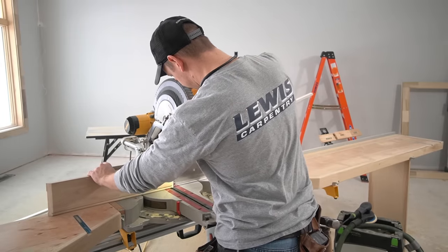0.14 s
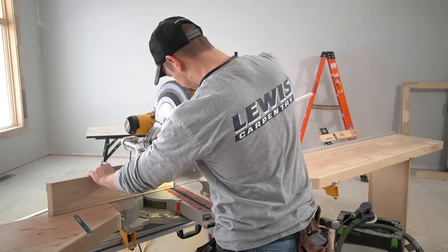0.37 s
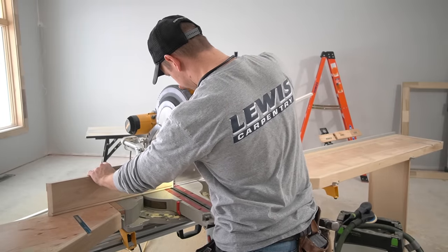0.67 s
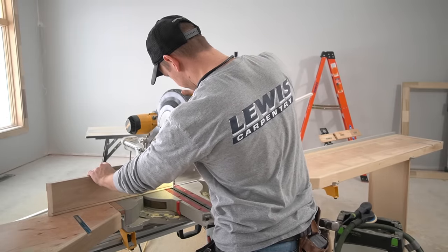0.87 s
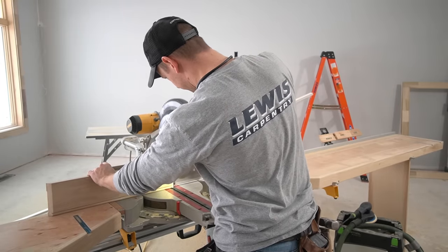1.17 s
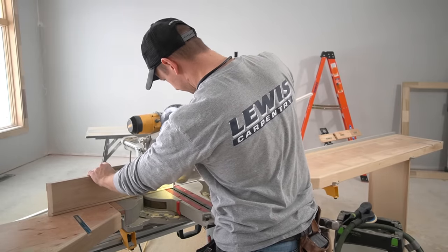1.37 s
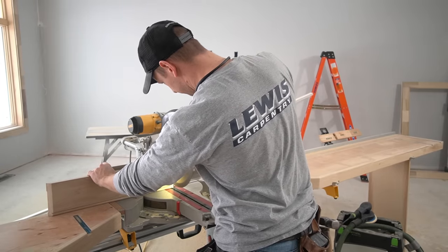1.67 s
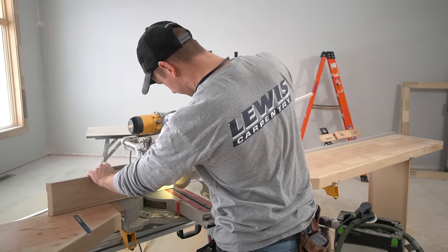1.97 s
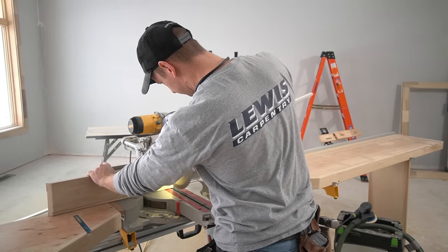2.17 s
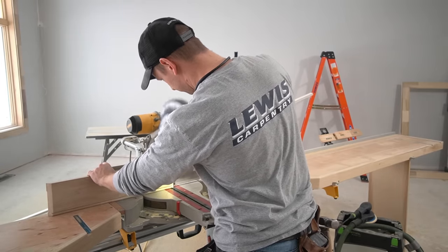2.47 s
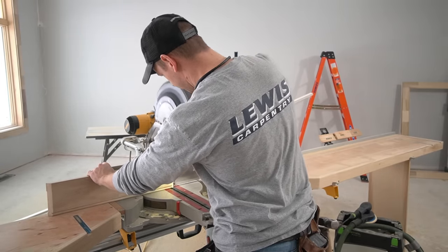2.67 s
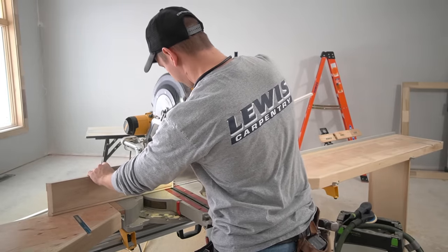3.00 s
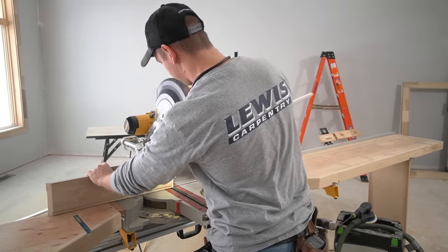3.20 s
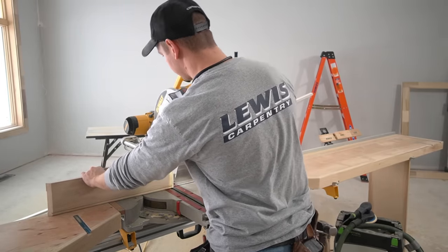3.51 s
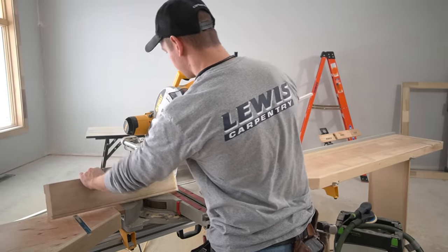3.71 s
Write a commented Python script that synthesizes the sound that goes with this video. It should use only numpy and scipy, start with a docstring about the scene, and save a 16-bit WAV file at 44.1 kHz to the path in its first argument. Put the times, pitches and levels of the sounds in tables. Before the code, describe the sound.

A power miter saw starts with a sharp clack and growl, whines upward, rasps through a wooden board, then brakes quickly with chattering gears and a thump; close microphone in a bare, reverberant room.

```python
"""Bare room: a sliding miter saw kicks in with a clack and a mains growl; gears, armature and fan whine upwards.
The blade rasps through a wooden board; on release the brake makes the gears chatter as they run down,
and the raised head thumps against its stop. Whines are multiples of one motor speed curve,
air and rasp are coloured noise and clicks, knocks and chatter ring modes."""
import sys
import numpy as np
from scipy import signal
from scipy.fft import rfft, irfft
from scipy.io import wavfile

SR = 44100
rng = np.random.default_rng(int(sys.argv[2]) if len(sys.argv) > 2 else 0)


def materialize(psi):
    """Save the field psi as 16-bit PCM at rate SR to the path in sys.argv[1].

    A 1-D psi becomes a single channel; in a 2-D psi each row is a channel.
    """
    bounded = np.clip(np.atleast_2d(psi).T, -1, 1)
    quanta = np.round(bounded * 32767).astype(np.int16)
    wavfile.write(sys.argv[1], SR, quanta)


N = 169785
TIME_S = np.arange(N) / SR
# motor turns per blade turn
GEAR_RATIO = 7.3
# modes of housing and blade: f/Hz, level/dB, t60/s
BODY = [(686, -12.5, 0.087), (1182, -2.5, 0.046), (1444, 2.5, 0.019), (2020, -2, 0.22), (2190, 5, 0.039),
        (2674, 9.5, 0.025), (3180, 7.5, 0.014), (3860, 13.5, 0.0091), (5620, 4.5, 0.016), (6770, 5, 0.011)]


def from_db(db):
    """Decibels to gain."""
    return 10 ** (np.asarray(db) / 20)


def rms_one(x):
    """Scale to unit rms."""
    return x / np.sqrt(np.mean(x ** 2) + 1e-20)


def level(rows, axis=1):
    """Gain from a dB curve: -120 dB before its first point, falling steadily after its last."""
    release_db_per_s = 108
    rows = np.array(rows)
    db = np.interp(TIME_S, rows[:, 0], rows[:, axis], left=-120)
    return from_db(db - release_db_per_s * np.maximum(TIME_S - rows[-1, 0], 0))


def coloured(x, colour):
    """Shape a spectrum by dB over log frequency, rolling off below the first point; rms 1."""
    hz, db = np.transpose(colour)
    f_hz = np.maximum(np.arange(N // 2 + 1) * SR / N, 1)
    gain = from_db(np.interp(np.log(f_hz), np.log(hz), db))
    return rms_one(irfft(rfft(x) * gain * np.minimum(f_hz / hz[0], 1), N))


def noise(colour):
    """Steady noise of a given spectrum; rms 1."""
    return coloured(rng.standard_normal(N), colour)


def drift(rate_hz):
    """Slow random signal, rms 1: white noise through two equal poles."""
    r = np.exp(-2 * np.pi * rate_hz / SR)
    settled = signal.lfilter([1], [1, -2 * r, r * r], rng.standard_normal(N + SR))[SR:]
    return rms_one(settled)


def grains(per_s, spread_db):
    """Random clicks of random sign and uneven size."""
    hits = rng.random(N) < per_s / SR
    size = from_db(spread_db * np.minimum(rng.exponential(1, N), 4))
    return hits * size * rng.choice([-1, 1], N)


def ring(x, modes):
    """Drive parallel decaying modes of alternating sign; rms 1."""
    out = 0
    for k, (hz, db, t60_s) in enumerate(modes):
        r = np.exp(-np.log(1000) / (t60_s * SR))
        w = 2 * np.pi * hz / SR
        mode = signal.lfilter([0, np.sin(w)], [1, -2 * r * np.cos(w), r * r], x + 1e-18)
        out = out + (-1) ** k * from_db(db) * mode
    return rms_one(out)


def lowpass(x, order, hz):
    """Butterworth low-pass."""
    return signal.sosfilt(signal.butter(order, hz, fs=SR, output="sos"), x)


def whine(turns, order, rough, rough_hz):
    """One multiple of a rotation, with a skirt of random flutter; rms about 1."""
    phase = 2 * np.pi * order * turns
    in_phase = (np.sqrt(2) + rough * drift(rough_hz)) * np.sin(phase)
    quadrature = rough * drift(rough_hz) * np.cos(phase)
    return (in_phase + quadrature) / np.sqrt(1 + rough ** 2)


def whines(turns, rows, orders, rough, rough_hz):
    """Several multiples of the motor speed, each with its own level column."""
    return sum(level(rows, axis=i + 1) * whine(turns, k, rough, rough_hz) for i, k in enumerate(orders))


def wobble(turns, depth):
    """Swell once per blade turn."""
    return 1 + depth * np.sin(2 * np.pi * turns / GEAR_RATIO)


def bursts(rows, attack_s):
    """Envelope of a series of blows: exponential rise and decay."""
    out = 0
    for start_s, db, decay_s in rows:
        age_s = np.maximum(TIME_S - start_s, 0)
        out = out + from_db(db) * (1 - np.exp(-age_s / attack_s)) * np.exp(-age_s / decay_s)
    return out


def background():
    """Low steady noise floor."""
    # f/Hz, density/dB (relative)
    floor_colour = [(25, -12), (60, 0), (250, -16), (3000, -25), (4000, -39)]
    return from_db(-53) * noise(floor_colour)


def room(x):
    """Dense, slightly dull reverberation of bare walls: decaying noise as impulse response."""
    t60_s, dull_hz = 0.46, 6000
    age_s = np.arange(SR) / SR
    tail = rng.standard_normal(SR) * np.exp(-np.log(1000) * age_s / t60_s) * (age_s > .004)
    tail = tail / np.sqrt(np.sum(tail ** 2))
    pole = np.exp(-2 * np.pi * dull_hz / SR)
    return signal.fftconvolve(x, signal.lfilter([1 - pole], [1, -pole], tail))[:N]


def bench(x):
    """A delayed reflection off the bench makes gliding tones swell and dip."""
    delay_s, gain = .00141, .55
    lag = int(delay_s * SR)
    return (x + gain * np.pad(x, (lag, 0))[:N]) / np.hypot(1, gain)


def housing(x):
    """Tones swell and linger as they glide through the housing modes, over a direct leak."""
    leak_db = -9
    peaks = 0
    for hz, _, t60_s in BODY:
        q = np.pi * hz * t60_s / np.log(1000)
        peaks = peaks + signal.lfilter(*signal.iirpeak(hz, q, fs=SR), x)
    return from_db(leak_db) * x + 2 * peaks


def struck(blow, modes, ring_db):
    """A blow plus the ringing it excites, scaled to the blow's spread."""
    return blow + from_db(ring_db) * np.std(blow) * ring(blow, modes)


def clacks():
    """Metal clacks of the gear train: short noise bursts ringing the housing."""
    # t/s, level/dB, decay/s
    clack_rows = [(.1115, -5, 0.0016), (.1155, -2.5, 0.0038), (2.965, -21, 0.0018), (3.175, -22, 0.0047),
                  (3.219, -9, 0.0032)]
    # f/Hz, density/dB (relative)
    clack_colour = [(100, -28), (350, -12.5), (1100, -7.5), (2300, -5.5), (3300, -19.5), (6700, -13.5),
                    (15500, -36)]
    return struck(bursts(clack_rows, attack_s=0.00081) * noise(clack_colour), BODY, ring_db=-11.5)


def thumps():
    """The head meets its stop: noise bursts ringing the saw's frame."""
    # t/s, level/dB, decay/s
    thump_rows = [(3.5155, -8, .009), (3.543, -24, .03)]
    # f/Hz, density/dB (relative)
    thump_colour = [(40, -3), (200, -10), (600, 1), (1150, 1.5), (1600, -7), (8000, -21), (15000, -31)]
    # frame modes: f/Hz, level/dB, t60/s
    frame_modes = [(680, 0, .06)]
    return struck(bursts(thump_rows, attack_s=0.0042) * noise(thump_colour), frame_modes, ring_db=-16)


def mains_growl():
    """Rough harmonics of 120 Hz while the motor draws its starting current."""
    # t/s, level/dB
    growl_db = [(.11, -60), (.13, -37), (.28, -34.5), (.5, -44)]
    # harmonics 1, 2, ...: level/dB
    partials_db = (-5, -12, 2.5, 1, -0.5)
    cycles = 120 * TIME_S
    growl = sum(from_db(db) * whine(cycles, k + 1, rough=.7, rough_hz=31)
                for k, db in enumerate(partials_db))
    return level(growl_db) * growl


def bearings(turns):
    """Low bearing tones, heard midway through the run-up, fading before top speed."""
    # t/s, level/dB per order
    bearing_db = [(.52, -35, -53), (.62, -32, -29.5), (.98, -29.5, -43), (1.1, -37.5, -53), (1.6, -29, -50)]
    # multiples of motor speed
    bearing_orders = (2.83, 3.57)
    return whines(turns, bearing_db, bearing_orders, rough=0.3, rough_hz=4.9)


def brushes(turns):
    """Brush sparking as dense clicks, plus a brush whistle tied to motor speed."""
    # t/s, level/dB
    spark_db = [(.58, -60), (.61, -23.5), (.89, -22), (.93, -27), (1.65, -23), (2.38, -28), (2.52, -23),
                (2.68, -45)]
    # f/Hz, density/dB (relative)
    spark_colour = [(5000, 23.5), (9000, -34), (12000, 22), (15500, -13)]
    sparks = coloured(grains(12000, spread_db=-7), spark_colour)
    flicker = from_db(-9 + 2.5 * drift(6.7))
    whistle = flicker * whine(turns, 36.5, rough=1.0, rough_hz=50)
    return level(spark_db) * (sparks + bench(lowpass(whistle, 20, 14000)))


def fan(turns):
    """Flickering fan whine at several multiples of motor speed."""
    # t/s, level/dB
    fan_db = [(.28, -41), (.4, -28.5), (.78, -32), (1.0, -40), (1.42, -28), (1.7, -35.5), (2.5, -49)]
    # multiples of motor speed
    fan_orders = (16, 19.6, 22.1, 29.4)
    # level/dB per order
    partials_db = (-6.5, -4.5, 3, -2)
    tones = sum(from_db(db) * whine(turns, k, rough=0.62, rough_hz=70) * from_db(4.6 * drift(10.5))
                for k, db in zip(fan_orders, partials_db))
    return level(fan_db) * lowpass(tones, 12, 9600)


def braking(turns):
    """Falling whines of gears and fan under the brake."""
    # t/s, level/dB per order
    brake_db = [(2.61, -45, -60), (2.64, -29.5, -44), (2.73, -32, -29), (2.8, -46, -30.5), (3.0, -55, -40)]
    # multiples of motor speed
    brake_orders = (17.9, 21.8)
    return whines(turns, brake_db, brake_orders, rough=.8, rough_hz=55)


def armature(turns):
    """Flickering whine of armature slots and commutator under full power, rougher at higher orders."""
    # t/s, level/dB per order
    slot_db = [(.57, -33, -43, -63), (.62, -23.5, -30, -18), (.72, -29, -18.5, -29), (.82, -25, -28, -28),
               (.93, -19.5, -16.5, -33), (1.04, -18.5, -28, -29), (1.18, -22, -22.5, -22),
               (1.3, -22, -25.5, -33), (1.55, -29.5, -30, -31), (1.75, -29, -32, -48),
               (2.35, -35, -45, -59), (2.47, -28.5, -23, -68)]
    # multiples of motor speed
    slot_orders = (14, 28, 42)
    out = 0
    for i, order in enumerate(slot_orders):
        tone = whine(turns, order, rough=0.16 + 0.55 * i, rough_hz=40.0)
        out = out + level(slot_db, axis=i + 1) * tone * from_db(1.8 * drift(6.7))
    return out


def gears(turns):
    """Mesh tone and octave swell with each blade turn; backlash smears the mesh and rattles the housing."""
    # t/s, level/dB
    mesh_db = [(.2, -29), (.27, -29), (.4, -25), (.47, -17), (.62, -19), (.75, -31), (.98, -23.5),
               (1.12, -17.5), (1.88, -20.5), (2.05, -26), (2.6, -33), (2.67, -17.5), (2.8, -21.5),
               (2.88, -28.5), (3.0, -28.5), (3.13, -22), (3.3, -37)]
    # octave of the mesh, strongest under the brake: t/s, level/dB
    edge_db = [(.2, -34.5), (.45, -24.5), (.7, -35), (2.66, -24), (2.99, -52), (3.06, -24.5), (3.13, -26),
               (3.26, -30)]
    # backlash under run-up and braking: t/s, level/dB
    chatter_db = [(.11, -29), (.14, -39), (.19, -55), (.24, -26.5), (.45, -20), (1.0, -38), (2.55, -18.5),
                  (2.7, -27), (2.95, -25), (3.07, -21), (3.3, -26.5), (3.85, -43.5)]
    # multiples of motor speed: mesh, octave
    gear_orders = (6, 12)
    backlash = level(chatter_db)
    mesh = whine(turns, gear_orders[0], rough=0.052 + 18 * backlash, rough_hz=96)
    edge = whine(turns, gear_orders[1], rough=0.67, rough_hz=136)
    tones = level(mesh_db) * mesh + level(edge_db) * housing(edge)
    contacts = lowpass(grains(630, spread_db=3) + 1e-18, 10, 9000)
    return tones * wobble(turns, depth=.4) + backlash * ring(contacts, BODY)


def air(turns):
    """Rush of air from blade and fan; hiss of the teeth, swelling once per blade turn."""
    # t/s, level/dB
    rush_db, hiss_db = [(.11, -50), (.13, -28.5), (.2, -26.5), (.26, -20.5), (.5, -18.5), (.85, -17.5),
                        (1.15, -21), (2.7, -22), (2.92, -24.5), (3.14, -32), (3.45, -29), (3.6, -28.5),
                        (3.85, -33.5)], [(.15, -50), (.3, -28), (.7, -18.5), (1.1, -20), (2.3, -24.5),
                                     (2.52, -21), (2.7, -27), (3.1, -30), (3.55, -49.5)]
    # f/Hz, density/dB (relative)
    rush_colour, hiss_colour = [(100, -23.5), (370, -10.5), (700, -0.5), (936, -2.5), (1060, -12.5),
                                (1520, 2.5), (1920, -2), (2580, -4.5), (5280, -13.5), (8060, -14.5),
                                (15500, -50)], [(1500, -0.5), (4200, 1), (6000, 4.5), (8000, 7),
                                                    (10000, 5), (11200, -3.5), (15500, -3.5)]
    hiss = level(hiss_db) * noise(hiss_colour) * wobble(turns, depth=0.13)
    return level(rush_db) * noise(rush_colour) + hiss


def squeal(turns):
    """The blade squeals as it leaves the cut: one multiple of motor speed."""
    # t/s, level/dB
    squeal_db = [(2.27, -60), (2.42, -24)]
    return level(squeal_db) * whine(turns, 23.8, rough=.5, rough_hz=20)


def cut(turns):
    """Clicks pulsing at the tooth rate: chips torn from the wood, and board and table ringing."""
    # t/s, level/dB
    cut_db = [(1.1, -32), (1.4, -19.5), (1.7, -16.5), (2.0, -15), (2.2, -16.5), (2.5, -20), (2.62, -22)]
    # f/Hz, density/dB (relative)
    cut_colour = [(150, -23.5), (462, -10.5), (643, -7), (1240, -9.5), (1700, -4), (4480, -14), (5760, -12),
                  (10100, -15.5), (15500, -19.5)]
    # board and table modes: f/Hz, level/dB, t60/s
    board_modes = [(691, -0.5, 0.094), (1454, 5.5, 0.093), (1660, 0.5, 0.16)]
    teeth, board_db = 60, -7.5
    tooth_pulse = 1 + np.cos(2 * np.pi * teeth * turns / GEAR_RATIO)
    bite = tooth_pulse * wobble(turns, depth=0.37) * from_db(1.8 * drift(45))
    rasp = coloured(bite * grains(9000, spread_db=5.0), cut_colour)
    board = ring(bite * grains(2500, spread_db=7.0), board_modes)
    return level(cut_db) * (rasp + from_db(board_db) * board)


def scene():
    """All whines but the mains growl follow one motor rotation; room and background are added."""
    # t/s, motor speed/(turns/s)
    speed = [(.11, 5), (.2, 98), (.3, 163), (.4, 213), (.5, 252), (.6, 283), (.72, 306), (.84, 323),
             (.96, 335.3), (1.21, 354.2), (1.66, 378.5), (1.92, 394.5), (2.35, 417), (2.63, 425),
             (2.8, 327), (2.95, 257), (3.12, 200), (3.4, 138), (3.85, 72)]
    turns = np.cumsum(np.interp(TIME_S, *np.transpose(speed), left=0)) / SR
    motor = mains_growl() + bearings(turns) + brushes(turns) + armature(turns)
    motor = motor + bench(braking(turns) + fan(turns))
    blade = air(turns) + squeal(turns) + cut(turns)
    saw = clacks() + thumps() + motor + gears(turns) + blade
    wet = from_db(-5.5)
    return ((saw + wet * room(saw)) / np.sqrt(1 + wet ** 2) + background())[None]


def record(dry):
    """Round peaks towards full scale, then cut the top."""
    top_cut = signal.firwin(601, 15750, fs=SR, window="blackman")
    return signal.fftconvolve(np.tanh(dry), top_cut[None], mode="same")


dry = scene()
out = record(dry)
materialize(out)
```